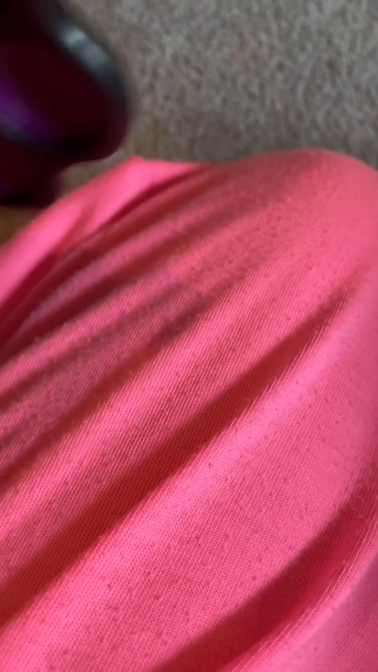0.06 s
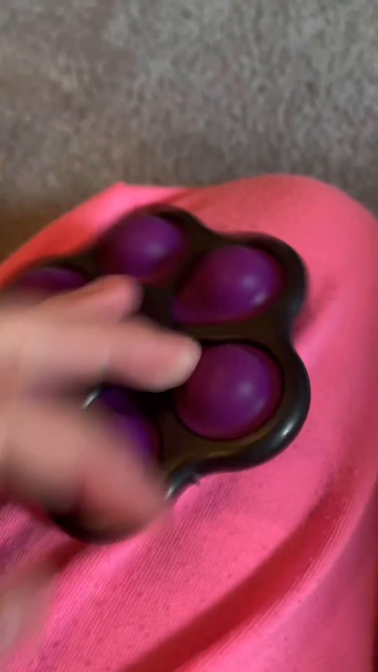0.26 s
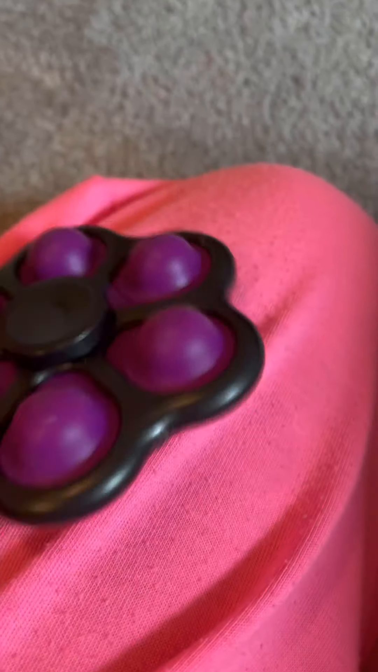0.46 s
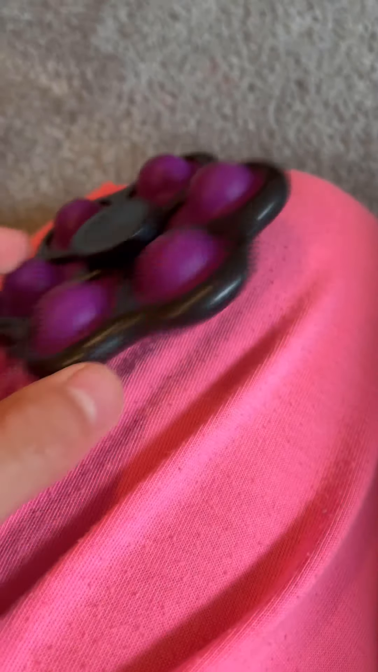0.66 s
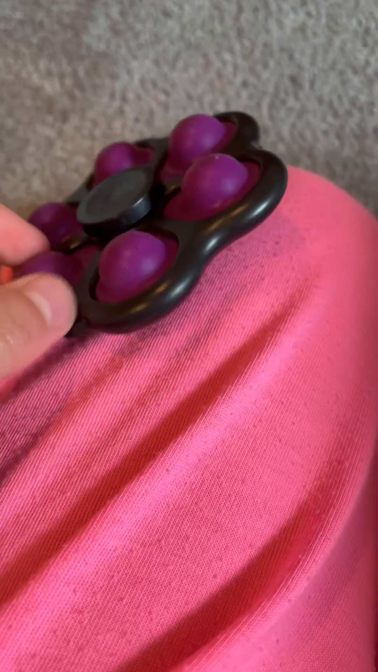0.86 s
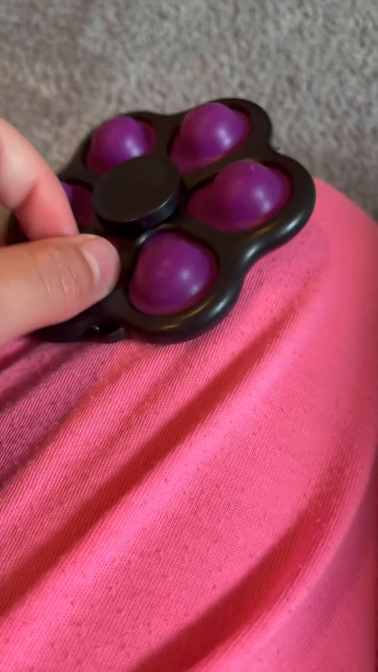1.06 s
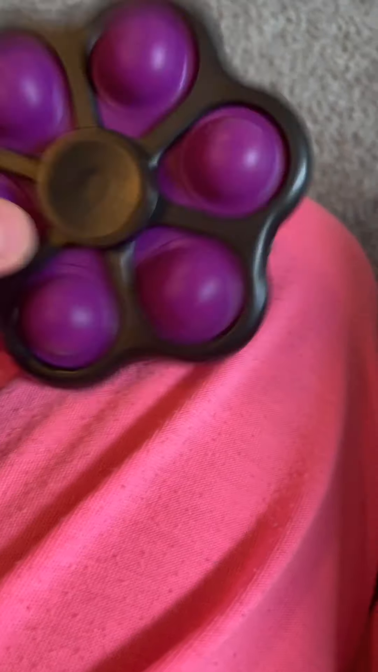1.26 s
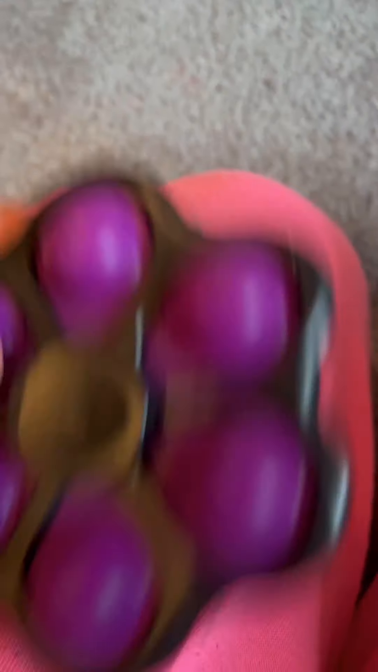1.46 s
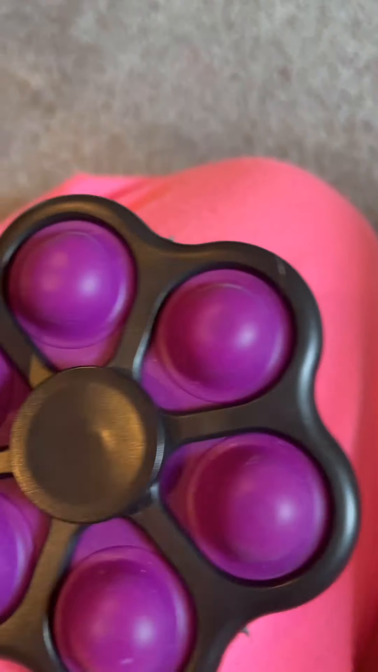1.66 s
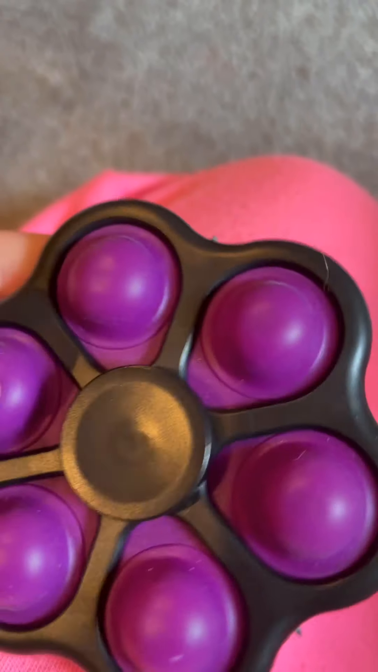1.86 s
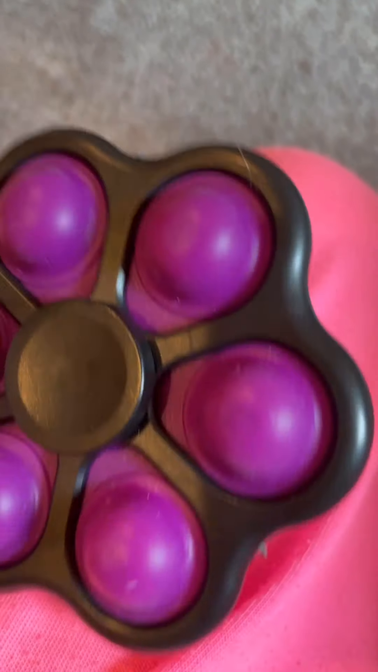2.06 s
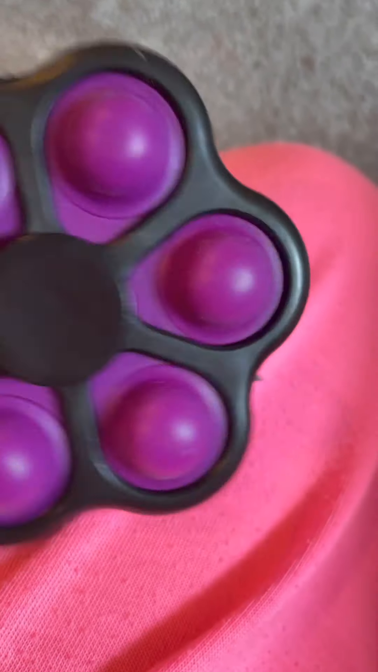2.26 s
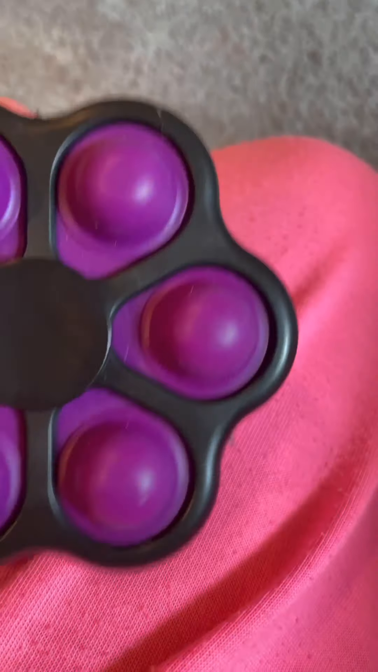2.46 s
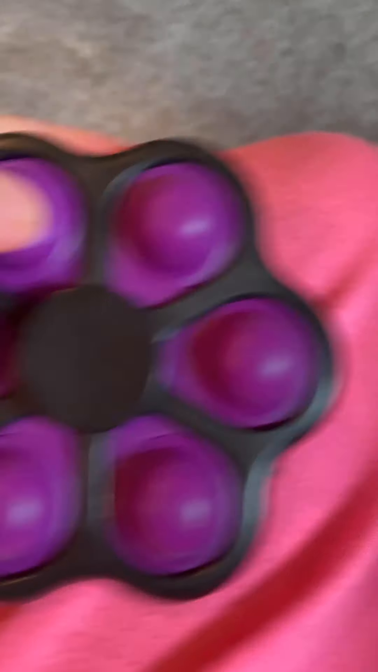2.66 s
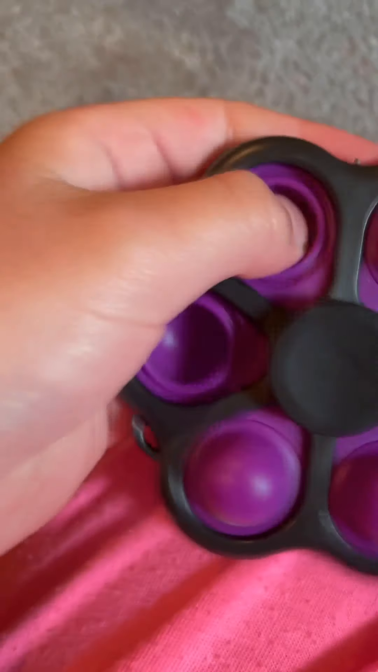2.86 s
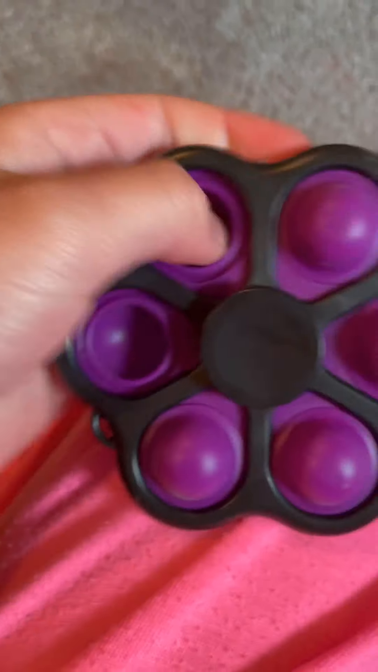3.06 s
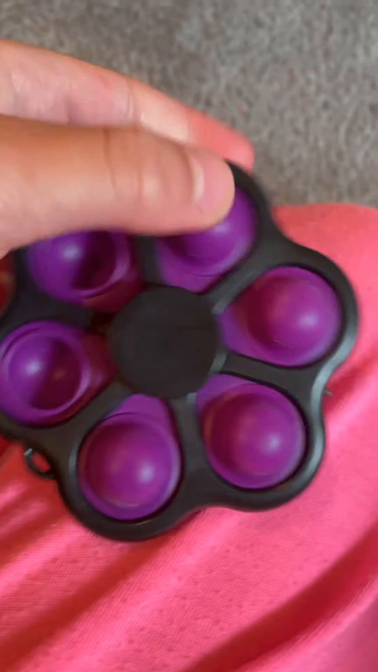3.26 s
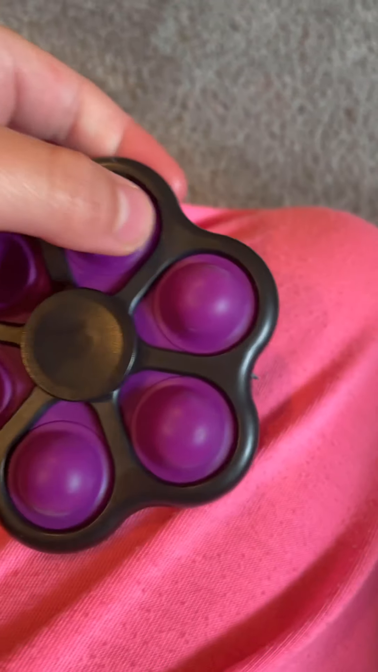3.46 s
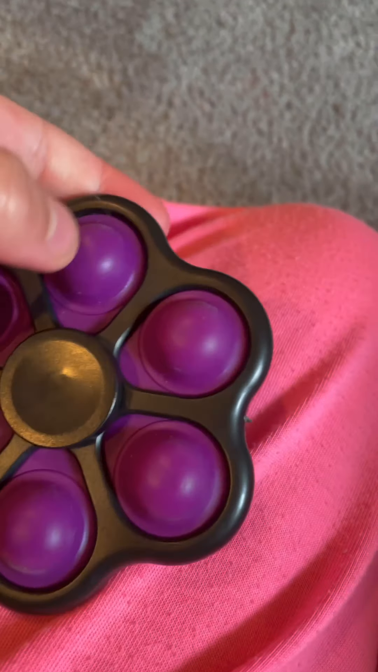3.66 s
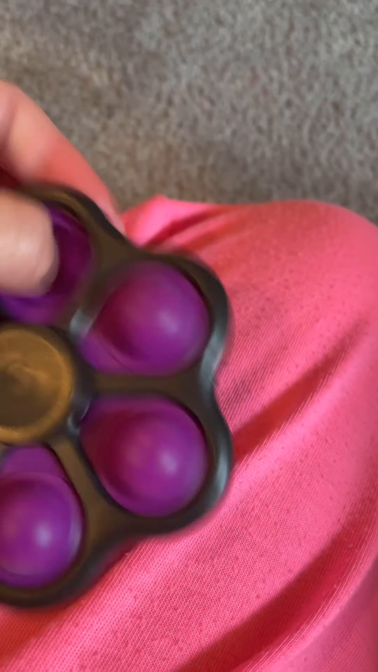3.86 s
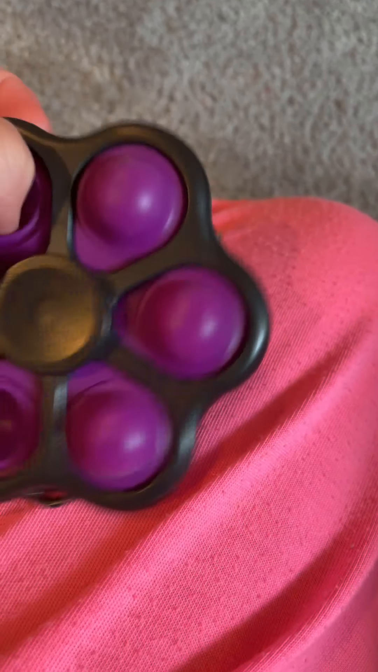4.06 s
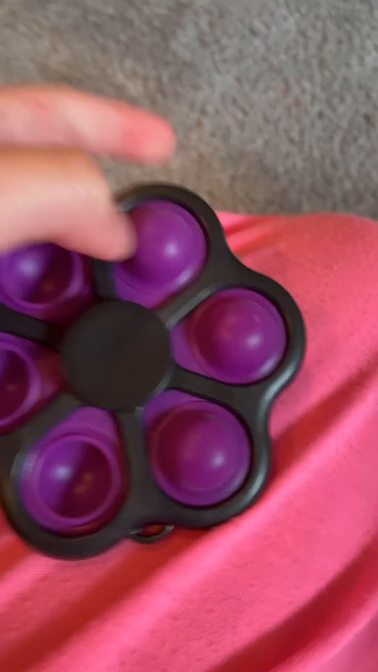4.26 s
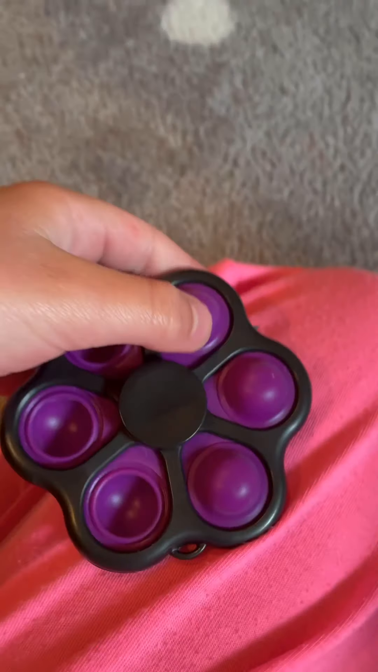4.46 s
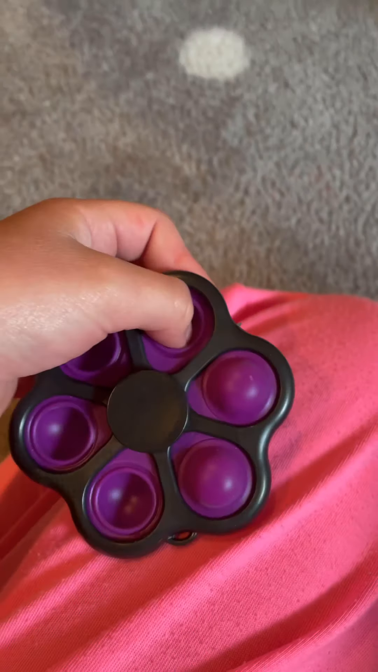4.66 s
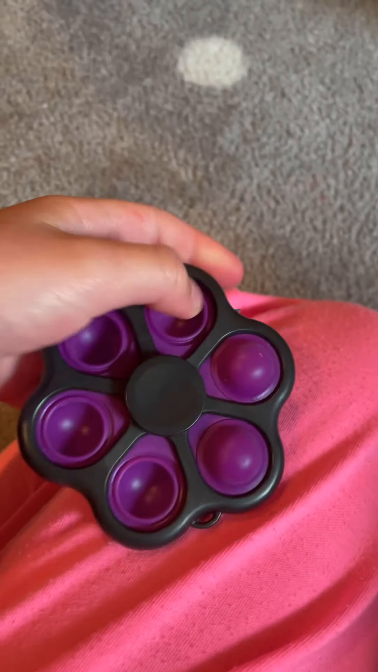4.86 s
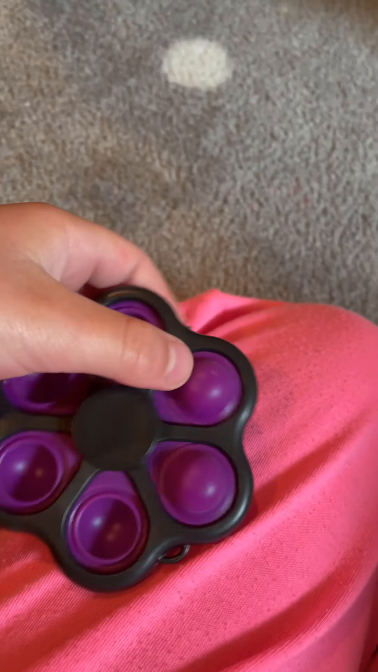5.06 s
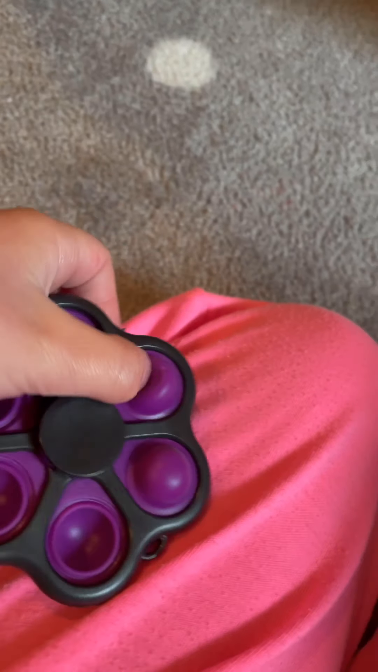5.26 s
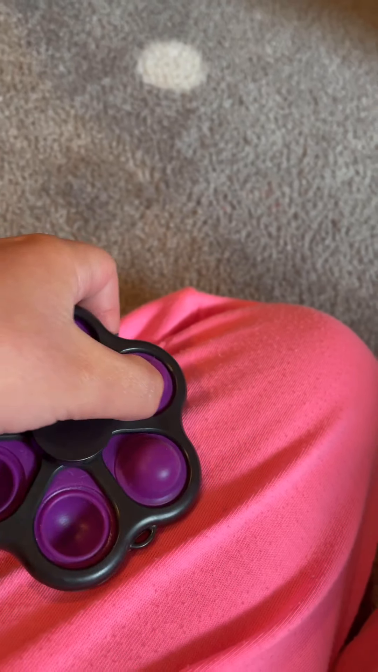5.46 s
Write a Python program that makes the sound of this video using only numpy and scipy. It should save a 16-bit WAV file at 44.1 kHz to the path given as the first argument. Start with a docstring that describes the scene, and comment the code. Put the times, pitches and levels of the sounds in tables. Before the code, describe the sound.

Close, quiet handling of a plastic-framed popping toy, with small clicks and cloth swishes, followed by four crisp hollow snaps from pressed bubbles.

```python
"""A silicone bubble toy in a plastic frame is handled over a lap, close to a phone, in a quiet carpeted room.
Throughout, the house rumbles faintly under thin hiss; from the start fingers tick (short rings and crackle)
and rub, and cloth swishes (noise shaped stroke by stroke). From about 2 s a thumb presses domes: each first
gives with a small buckle, then snaps through with a click of decaying modes, a thump of air and a room tail.
Near 3.5 s, between presses, the silicone creaks in regular slips under the thumb."""
import sys
import numpy as np
from scipy import signal
from scipy.fft import rfft, irfft, next_fast_len
from scipy.io import wavfile
from scipy.ndimage import uniform_filter1d, map_coordinates

SR = 44100
rng = np.random.default_rng(int(sys.argv[2]) if len(sys.argv) > 2 else 0)


def waveform_to_disk(signal):
    """Save audio, clipped to [-1, 1], as 16-bit WAV at the path in sys.argv[1]."""
    frames = np.transpose(np.atleast_2d(signal))
    scaled = np.clip(frames, -1, 1) * 32767
    samples = np.round(scaled).astype(np.int16)
    wavfile.write(sys.argv[1], SR, samples)


N = 242991  # samples in the scene

# Buckling domes: (time [s], dome level [dB], dome pitch [Hz], rim pitch [Hz], rim [dB re dome],
# thump [dB re dome], crackle [dB re dome], share of thump pitch left at the end [0-1],
# length scale [ms], thump delay [ms], room [dB re dome])
DOME_POPS = [(1.960, -43.5, 2590, 930, 1, 23, -12.5, 0.8, 1.1, 0.069, -21.5),
             (1.981, -30.5, 2490, 3630, -26, -17, -27.5, 1, .9, 0.51, -24.5),
             (1.9887, -9, 2517, 1867, -19, 3.5, -13.5, 0.14, 1.1, 1.8, -42.5),
             (2.7885, -34.5, 2475, 1492, -12, 9.5, -10, 0.46, 0.75, 1.8, -29.5),
             (2.8671, -11, 2424, 1400, -10.5, 7, -8.5, 0.83, 0.84, 0.71, -36),
             (3.854, -32.5, 2832, 1520, -8.5, 14, -7, 0.67, 1.1, 0.7, -21),
             (3.8737, -15.5, 2350, 1585, -26, 6, -1, 0.83, .8, 1.1, -30),
             (4.587, -46, 1670, 2640, -28, 16.5, 4, 0.57, 1.1, 0.1, -19),
             (4.6336, -19.5, 2243, 1770, -5.5, 1, -7.5, 1, 1.14, 1.7, -32.5),
             (4.6355, -29, 1360, 834, -2.5, -1, -14, 0.94, 1.2, 2, -29)]
# Upper modes of a dome: (multiple of its pitch, level [dB])
DOME_OVERTONES = [(1.48, -14), (2.352, -21)]
# Crackle spectrum of folding silicone: (frequency [Hz], density [dB per Hz])
FOLD_CRACKLE = [(700, -10), (1100, -23.5), (1500, -8.5), (2400, 0.5), (3100, -4.5), (3700, -7.5),
                (4500, -9), (5300, -3), (7000, -6), (9000, -8.5), (12000, -21.5), (15500, -19.5),
                (16300, -25), (16800, -42.5)]


def pops():
    """Snap-through buckling: dome modes ring and crackle, the rim rings on, air thumps, the room answers."""
    near = np.zeros(N + SR)
    far = np.zeros((2, N + SR))
    lead = 256  # samples before the snap, for the gradual rise
    t = (np.arange(1536) - lead) / SR
    for (time, db, dome_hz, rim_hz, rim_db, thump_db, crackle_db,
         sag, length_ms, delay_ms, room_db) in DOME_POPS:
        length = length_ms / 1000
        modes = np.sin(2 * np.pi * dome_hz * t)
        for ratio, level_db in DOME_OVERTONES:
            modes += amp(level_db) * np.sin(2 * np.pi * (ratio * dome_hz * t + rng.random()))
        dome = modes * swell(t, 1.3 * length, 0.77 * length)

        rim_shape = swell(t - 0.3 * length, 0.48 * length, 3.0 * length)
        rim = amp(rim_db) * np.sin(2 * np.pi * rim_hz * t) * rim_shape
        crackle_shape = swell(t, 0.8 * length, 2.5 * length)
        crackle = amp(crackle_db) * noise(FOLD_CRACKLE, size=len(t)) * crackle_shape
        air = amp(thump_db) * thump(t - delay_ms / 1000, sag)

        start = round(time * SR)
        near[start - lead:][:len(t)] += amp(db) * (dome + rim + crackle + air)
        tail = amp(db + room_db) * room(dome_hz)
        far[:, start:][:, :tail.shape[1]] += tail
    return near[:N], far[:, :N]


THUMP_HZ = 519  # air cavity under a dome
LEAK_HZ = 140  # high-pass corner: slow pressure escapes round the thumb


def thump(t, sag):
    """Cavity resonance: displaced air oscillates, and its pitch sags as the cavity opens."""
    late = np.maximum(t, 0)
    turns = THUMP_HZ * (sag * late + (1 - sag) * 0.003 * (1 - np.exp(-late / 0.0032)))
    envelope = (1 - np.exp(-late / 0.00067)) * amp(-60 * late / 0.01)  # falls 60 dB in 10 ms
    push = np.sin(2 * np.pi * turns) * envelope
    return filtered(push, lambda hz: 1j * hz / (1j * hz + LEAK_HZ))


# Reverberation time of the walls: (frequency [Hz], t60 [s])
WALL_DECAY = [(300, 0.23), (800, 0.24), (2100, .34), (5500, 0.19), (14000, 0.4)]
# Colour of the room's answer: (frequency [Hz], density [dB per Hz])
ROOM_COLOUR = [(200, -7.5), (450, 1.5), (700, -3.5), (1100, -21.5), (1500, -10), (2400, -11), (3500, -13),
               (5500, -13), (8000, -18.5), (12000, -31), (15700, -35.5), (16100, -59.5)]


def room(dome_hz):
    """Diffuse reverberation: two unrelated tails, strong near the dome's pitch, with t60 set by frequency."""
    tails = [noise(ROOM_COLOUR, size=SR // 2), noise(ROOM_COLOUR, size=SR // 2)]
    hz, frame_t, bins = signal.stft(tails, SR, nperseg=256)
    emphasis = 1 + amp(5.5) * np.exp(-((hz - dome_hz) / 280) ** 2)
    decay = amp(-60 * frame_t / along(WALL_DECAY, hz)[:, None])
    tail = signal.istft(bins * emphasis[:, None] * decay, SR, nperseg=256)[1]
    t = np.arange(tail.shape[1]) / SR
    ceiling = 1 + swell(t - 0.0135, 0.0008, 0.0018)  # one strong return from above stands out
    roughness = amp(2.5 * wobble(220)[:len(t)])  # random level changes make the tail grainy
    onset = 1 - np.exp(-(t / 0.0029) ** 2)
    return tail * ceiling * roughness * onset


# Fingers catching on the toy: (time [s], ring level [dB], pitch [Hz], knock [dB re ring])
FINGER_TICKS = [(0.0342, -54.5, 3508, 4.5), (0.231, -43, 5213, -18), (0.2531, -37.5, 3072, -9),
                (0.265, -57, 3000, -5), (0.3485, -61.5, 2690, -33), (.397, -67, 2720, -37),
                (0.435, -67, 3200, -28), (0.4461, -49.5, 3070, -36), (0.48, -59, 3000, -25),
                (0.4967, -51, 2754, -20), (0.5393, -44.5, 3178, -31), (0.5451, -50, 2540, -17),
                (0.553, -50, 2761, -20), (0.5744, -57, 3020, -30), (0.582, -59, 2970, -32),
                (.609, -73, 2800, 13), (1.1961, -52.5, 5900, 0.5), (1.1992, -52.5, 4053, -10),
                (1.2571, -41, 5737, -13.5), (1.2606, -47.5, 5933, -5), (1.2829, -46, 5823, -10),
                (1.2863, -40, 5980, -14), (1.2917, -43, 4030, -17), (1.316, -59.5, 4090, 3),
                (1.341, -58.5, 3239, 3.5), (1.4334, -55, 3352, -4), (1.5016, -62, 3247, 1),
                (1.5233, -51.5, 2789, -4), (1.6133, -58, 3205, -16), (1.6193, -52.5, 2657, -16.5),
                (1.912, -67, 2574, 8.5), (2.1618, -46, 5100, -7.5), (2.171, -52, 3159, -1.5),
                (2.3942, -54, 3165, -10.5), (2.534, -67.5, 2798, 11), (2.685, -85.5, 2600, 11),
                (2.721, -74, 4300, -3), (2.86, -48, 2580, 3), (2.9791, -57, 2442, 8), (3.001, -59, 4108, 2),
                (3.1037, -57, 2422, -6.5), (3.261, -69, 2580, -15), (3.6987, -73, 2260, -5),
                (3.7688, -61.5, 2560, -12.5), (3.7781, -43, 2689, -10.5), (3.8601, -52, 2375, 7),
                (3.8658, -48, 2460, -2), (3.8692, -38, 2665, 3.5), (4.1509, -55.5, 1710, 0),
                (4.1684, -58.5, 2700, -1), (4.179, -50, 6076, -8), (4.2037, -63, 2570, 0),
                (4.2412, -46.5, 2570, -13.5), (4.5388, -50.5, 2680, -15), (4.5516, -55, 2470, -19),
                (4.5845, -48.5, 5470, -19), (4.6099, -49, 6136, -20), (4.6207, -58, 4400, 0.5),
                (4.8556, -51.5, 2500, -5), (5.0753, -76, 2735, -12), (5.2122, -82, 1533, 22.5),
                (5.245, -62.5, 1930, -27), (5.284, -61.5, 2750, -23)]
# Crackle spectrum of a tick: (frequency [Hz], density [dB per Hz])
NAIL_CRACKLE = [(900, -32), (1600, -18), (2700, -1.5), (4000, -6.5), (5800, -1.5), (8000, -11.5),
                (12000, -15), (15700, -19.5), (16300, -47.5)]
TICK_CRACKLE_DB = -3  # re ring, for knocks of 0 dB or more
CRACKLE_PER_KNOCK = 0.24  # a softer knock comes with a softer crackle, dB per dB


def ticks():
    """Impact excitation: catches of skin and nail give an unsteady ring, a crackle and a knock of the frame."""
    out = np.zeros(N + SR)
    lead = 256  # samples before the catch
    t = (np.arange(1024) - lead) / SR
    for time, db, hz, knock_db in FINGER_TICKS + snags(count=2):
        waver = 0.25 * np.cumsum(rng.standard_normal(len(t)))  # the contact shifts, so the phase wanders
        ring = np.sin(2 * np.pi * hz * t + waver) * swell(t, 0.00033, 0.0025)
        crackle_db = TICK_CRACKLE_DB + CRACKLE_PER_KNOCK * min(knock_db, 0)
        crackle = amp(crackle_db) * noise(NAIL_CRACKLE, size=len(t)) * swell(t, 0.00067, 0.002)
        knock_hz = 620 * np.exp(rng.normal(0, 0.12))
        knock = amp(knock_db) * np.sin(2 * np.pi * knock_hz * t) * swell(t - 0.002, 0.0015, 0.002)
        start = max(round(time * SR) - lead, 0)
        out[start:][:len(t)] += amp(db) * (ring + crackle + knock)
    return out[:N]


# Stray catches: mean level over the stroke's skin level, its scatter, median pitch, knock re ring
SNAG_DB, SNAG_SPREAD_DB, SNAG_HZ, SNAG_KNOCK_DB = 3, 4, 3000, -9.5


def snags(count):
    """Stick-slip at random: count catches during every stroke's hold, as rows like FINGER_TICKS."""
    rows = []
    for start, hold, skin_db, _ in HAND_STROKES:
        for _ in range(count):
            time = start + hold * rng.random()
            db = skin_db + SNAG_DB + SNAG_SPREAD_DB * rng.standard_normal()
            hz = SNAG_HZ * np.exp(0.13 * rng.standard_normal())
            rows.append((time, db, hz, SNAG_KNOCK_DB))
    return rows


# Skin on the toy: (frequency [Hz], density [dB per Hz])
SKIN_SPECTRUM = [(500, -8), (800, -9.5), (1200, -19), (1900, -12), (2300, -4), (2700, -3), (3200, -10),
                 (4000, -10.5), (5500, -13), (8000, -24), (15700, -35.5), (16100, -62)]
# Swishing cloth: (frequency [Hz], density [dB per Hz])
CLOTH_SPECTRUM = [(2000, -23.5), (4500, -12.5), (7500, 1), (9000, -0.5), (11000, -10.5), (13500, -7.5),
                  (15700, -14), (16100, -39)]
# Padded sound of the lap: (frequency [Hz], density [dB per Hz])
LAP_SPECTRUM = [(100, -18), (180, 0.5), (320, -4.5), (550, -10.5), (800, -23), (1100, -40.5)]
# The toy and hands shifting on the lap: (time [s], level [dB])
LAP_LEVEL = [(0.0, -68), (0.47, -74), (0.66, -67.5), (0.87, -81.5), (1.1, -74.5), (1.38, -68), (1.7, -73.5),
             (2.101, -73), (2.522, -76), (2.78, -76.5), (2.98, -72), (3.18, -80), (3.41, -94.5),
             (3.87, -73.5), (4.399, -88), (4.76, -78.5), (5.0, -98), (5.51, -106)]
SKIN_RISE_DB_PER_S, SKIN_FALL_DB_PER_S = 651, 400
CLOTH_RISE_DB_PER_S, CLOTH_FALL_DB_PER_S = 329.5, 280


def rubbing():
    """Friction noise: skin drags in grainy jerks, cloth swishes more smoothly, the lap shifts; two draws each."""
    skin_db, cloth_db = np.transpose(HAND_STROKES)[2:]
    jerks = amp(2.5 * wobble(45) + 3.5 * wobble(220))
    swish = amp(1.6 * wobble(35) + 1.7 * wobble(120))
    skin = patchy(jerks * [noise(SKIN_SPECTRUM), noise(SKIN_SPECTRUM)], patchy_db=3)
    cloth = patchy(swish * [noise(CLOTH_SPECTRUM), noise(CLOTH_SPECTRUM)], patchy_db=5.5)
    lap = unit(amp(3 * wobble(15)) * [noise(LAP_SPECTRUM), noise(LAP_SPECTRUM)])

    skin_gain = strokes(skin_db, SKIN_RISE_DB_PER_S, SKIN_FALL_DB_PER_S)
    cloth_gain = strokes(cloth_db, CLOTH_RISE_DB_PER_S, CLOTH_FALL_DB_PER_S)
    lap_gain = amp(np.interp(np.arange(N) / SR, *np.transpose(LAP_LEVEL)))
    return skin_gain * skin + cloth_gain * cloth + lap_gain * lap


# Strokes of the hand: (start of hold [s], hold [s], skin on toy [dB], cloth [dB])
HAND_STROKES = [(0.027, 0.037, -80, -84.5), (.187, .02, -65, -65), (.25, 0.064, -67, -74),
                (0.468, .035, -70, -77), (.555, 0.016, -65.5, -79), (.63, .13, -86.5, -80),
                (.93, .075, -86, -76.5), (1.1, 0.044, -71.5, -82.5), (1.255, .045, -68.5, -73.5),
                (1.345, .05, -84, -78), (1.44, .025, -69.5, -74.5), (1.521, .025, -74.5, -76),
                (1.62, 0.044, -71.5, -82), (1.72, .08, -92, -107), (1.85, .03, -81.5, -85),
                (2.05, .08, -80, -85.5), (2.145, .03, -67.5, -78.5), (2.287, .02, -81, -81),
                (2.41, .02, -71, -87), (2.442, 0.0065, -80.5, -66), (2.642, 0.065, -91, -83),
                (2.808, .03, -82.5, -86.5), (3.017, .03, -69.5, -79.5), (3.266, 0.036, -84, -80),
                (3.572, .028, -68.5, -77.5), (3.779, 0.014, -73, -80.5), (3.884, 0.14, -82, -84.5),
                (4.04, .06, -76, -80), (4.154, .025, -74, -84), (4.215, 0.052, -76, -81.5),
                (4.383, 0.012, -99, -84.5), (4.596, .04, -63, -80.5), (4.828, 0.035, -73.5, -79.5),
                (4.918, 0.028, -71, -83.5), (5.252, 0.016, -82, -87.5)]


def strokes(levels_db, rise, fall):
    """Exponential envelopes: each stroke rises, holds and falls at steady dB a second, and the gains add."""
    t = np.arange(N) / SR
    gain = np.zeros(N)
    for (start, hold, *_), db in zip(HAND_STROKES, levels_db):
        before = np.maximum(start - t, 0)
        after = np.maximum(t - start - hold, 0)
        gain += amp(db - rise * before - fall * after)
    return gain


def patchy(x, patchy_db):
    """Time-frequency modulation: random bands swell and fade on their own as the contact moves about."""
    bins = signal.stft(x, nperseg=256)[2]
    field = rng.standard_normal(bins.shape[-2:])
    field = uniform_filter1d(uniform_filter1d(field, 4, 0), 14, 1)  # smooth over frequency, then time
    return unit(signal.istft(bins * amp(patchy_db * unit(field)), nperseg=256)[1][..., :N])


# Silicone slipping under the thumb: (start [s], end [s], slip rate [Hz], pulse level [dB])
SILICONE_CREAK = (3.52, 3.67, 168, -67.5)


def creak():
    """Periodic stick-slip: regular slips, swelling and fading, each send a soft pulse through the toy."""
    start, end, slip_hz, db = SILICONE_CREAK
    times = np.arange(start, end, 1 / slip_hz)
    slips = np.zeros(N)
    slips[np.round(times * SR).astype(int)] = np.hanning(len(times) + 2)[1:-1]
    t = np.arange(256) / SR
    pulse = np.sin(2 * np.pi * 650 * t) * swell(t - 0.002, 0.001, 0.001)
    return amp(db) * np.convolve(slips, pulse)[:N]


# Phase lead of the left port: (frequency [Hz], lead [rad])
PORT_LEAD = [(100, .1), (300, .18), (600, .28), (1200, .15), (1800, .4), (2600, .9), (3300, .6), (4500, .9),
             (7500, 2.2), (10000, 2.8), (13000, 3.6), (15000, 4.1), (16300, 4.6)]


def ports(x):
    """Inter-channel phase difference: one sound reaches two ports with a frequency-dependent phase lead."""
    return filtered(x, lambda hz: np.exp(0.5j * np.outer([1, -1], along(PORT_LEAD, hz))))


# House rumble: (frequency [Hz], density [dB per Hz])
RUMBLE_SPECTRUM = [(8.8, -53), (15, -25), (31, -10), (75, 2.5), (100, -4.5), (119, -13), (221, -21.5),
                   (267, -24.5), (306, -26.5), (389, -42.5), (900, -57), (1170, -84.5), (1980, -120)]
# Thin hiss: (frequency [Hz], density [dB per Hz])
HISS_SPECTRUM = [(120, -38.5), (300, 14), (600, 1.5), (1200, -4), (2600, -11), (4000, -14.5), (7500, -19),
                 (11000, -25.5), (15700, -22), (16100, -55.5)]
# Left-right correlation of the hiss, clipped to -1..1 in use: (frequency [Hz], correlation)
HISS_LIKENESS = [(60, 0.53), (130, 0.35), (300, -0.24), (640, -1.1), (1400, -0.33), (3100, .4), (7000, -.2),
                 (15000, -.5)]
RUMBLE_DB, HISS_DB = -58.5, -79.5  # centre levels, about which each drifts


def background():
    """Spatial coherence: rumble nearly common to both ports under hiss with a set left-right correlation."""
    apart = amp(-26) * np.outer([1, -1], noise(RUMBLE_SPECTRUM))
    rumble = amp(RUMBLE_DB + 1.5 * wobble(3)) * (noise(RUMBLE_SPECTRUM) + apart)

    def mid_side_weights(hz):
        """Energy-preserving rotation: the cosine of twice the angle is the left-right correlation."""
        angle = np.arccos(np.clip(along(HISS_LIKENESS, hz), -1, 1)) / 2
        return np.array([np.cos(angle), np.sin(angle)])

    mid, side = filtered(np.array([noise(HISS_SPECTRUM), noise(HISS_SPECTRUM)]), mid_side_weights)
    hiss = amp(HISS_DB + 1.9 * wobble(5.3)) * np.array([mid + side, mid - side])
    return rumble + hiss


def amp(db):
    """Decibel law: amplitude ratio of a level."""
    return 10 ** (np.asarray(db) / 20)


def unit(x):
    """Power normalisation: x scaled to rms 1."""
    return x / np.sqrt(np.mean(x ** 2) + 1e-20)


def along(points, hz):
    """Logarithmic frequency scale: (frequency [Hz], value) points interpolated at hz."""
    f, values = np.transpose(points)
    return np.interp(np.log(hz + 1), np.log(f + 1), values)


def wobble(rate):
    """Random modulation: a smooth curve through random knots, rate of them a second."""
    knots = rng.standard_normal(int(N * rate / SR) + 4)
    return map_coordinates(knots, [np.arange(N) * rate / SR])


def filtered(x, response):
    """Linear filtering: the spectrum of x times a complex response of frequency."""
    n = x.shape[-1]
    padded = next_fast_len(n + 8192)
    return irfft(rfft(x, padded) * response(np.fft.rfftfreq(padded, 1 / SR)), padded)[..., :n]


def noise(spectrum, size=N):
    """Spectral shaping: white noise coloured by a spectrum, rms 1."""
    return unit(filtered(rng.standard_normal(size), lambda hz: amp(along(spectrum, hz))))


def swell(t, rise, fall):
    """Two-sided Gaussian envelope: a bell up to 1 at t = 0, then a bell of another width down."""
    return np.exp(-(t / np.where(t < 0, rise, fall)) ** 2)


def scene():
    """Superposition: near sounds share one path to the ports, spread-out sounds add a side signal."""
    near, far = pops()
    rub = rubbing()
    side = amp(-11.5) * rub[1] + amp(-8) * far[1]  # part of the spread-out sound differs between the ports
    side = filtered(side, lambda hz: hz ** 2 / (hz ** 2 + 700 ** 2))  # long waves reach both ports alike
    centre = near + far[0] + rub[0] + ticks() + creak()
    return ports(centre) + np.array([side, -side]) + background()


TOP_HZ = 16600  # band limit


def record(dry):
    """Band limitation: the deepest bass rolls off gently, and nothing sounds above the band limit."""
    return filtered(dry, lambda hz: (1j * hz / (1j * hz + 25)) ** 2 * (hz < TOP_HZ))


dry = scene()
out = record(dry)
waveform_to_disk(out)
```